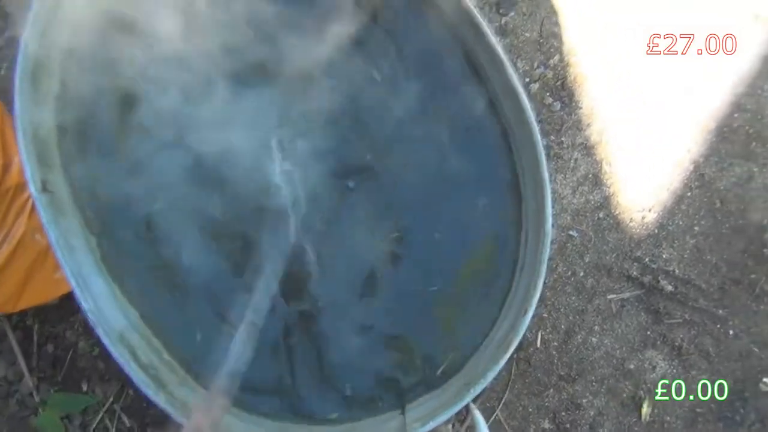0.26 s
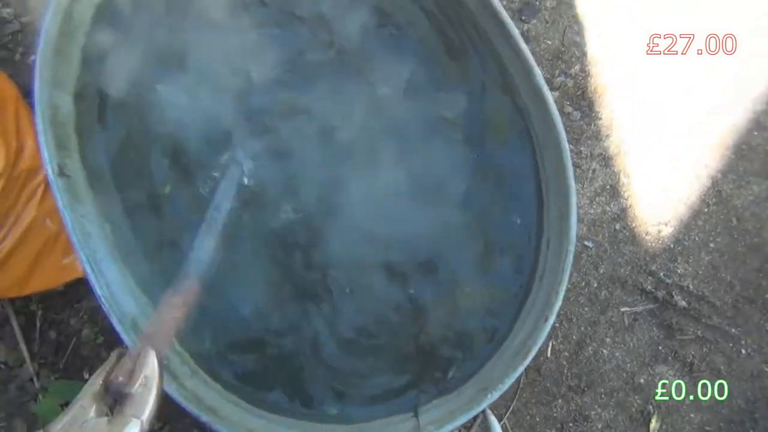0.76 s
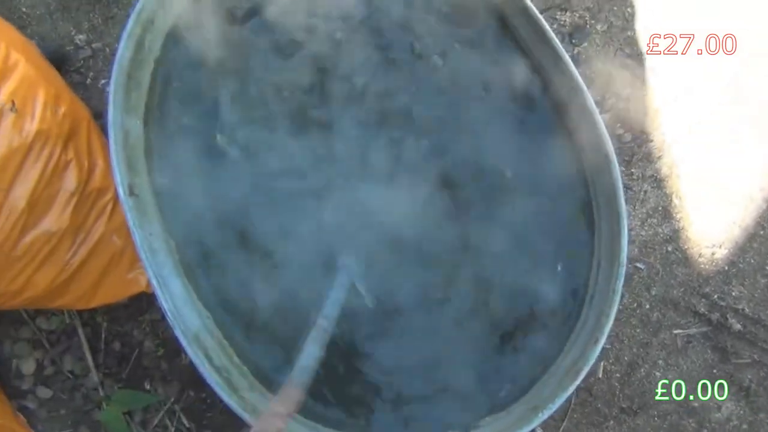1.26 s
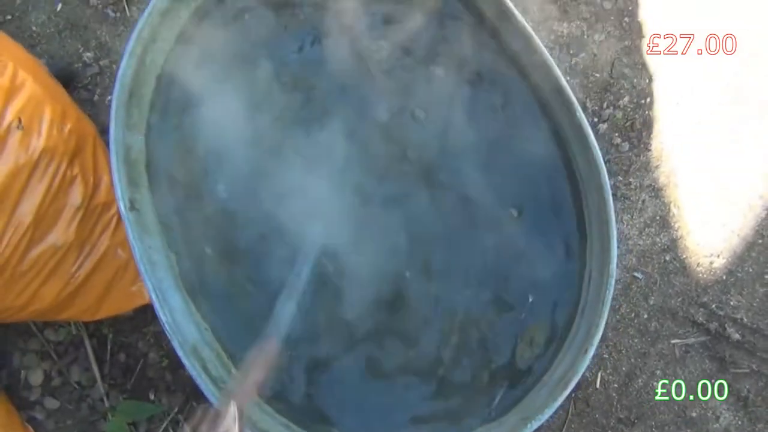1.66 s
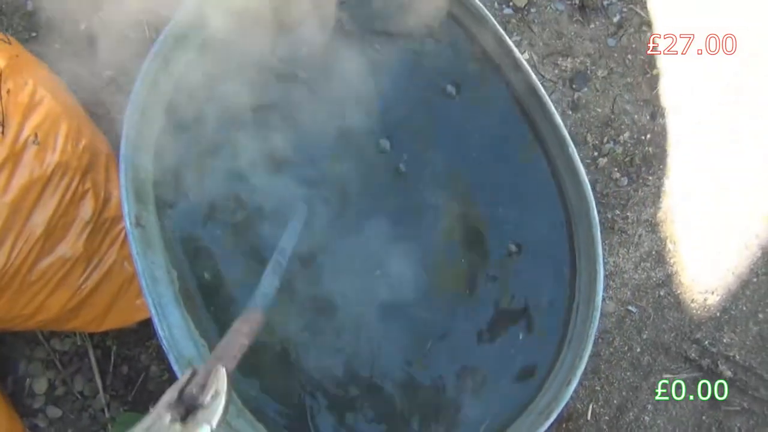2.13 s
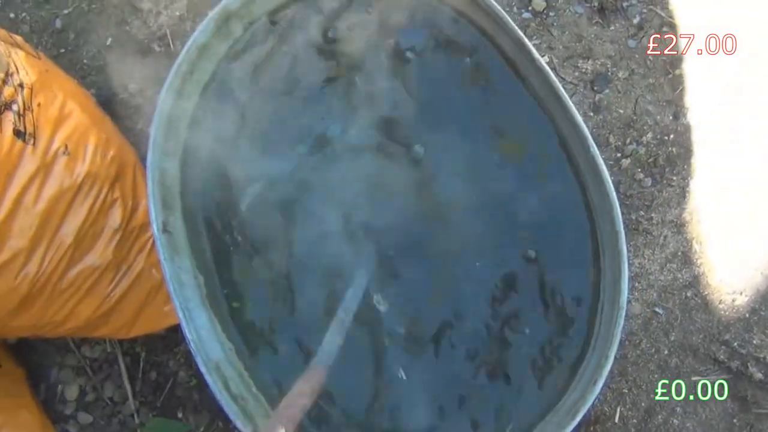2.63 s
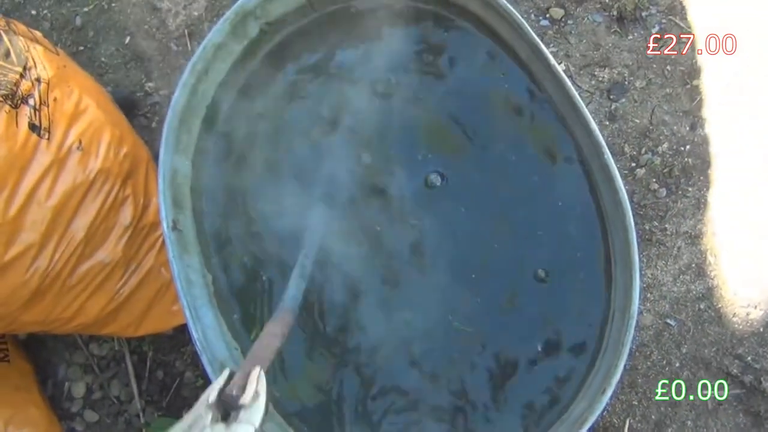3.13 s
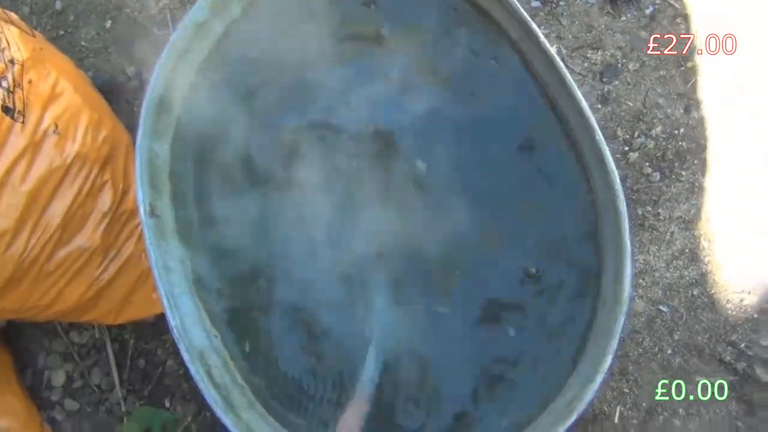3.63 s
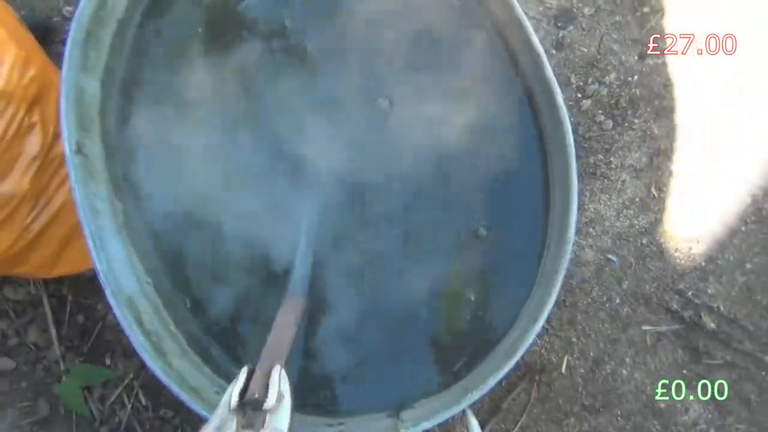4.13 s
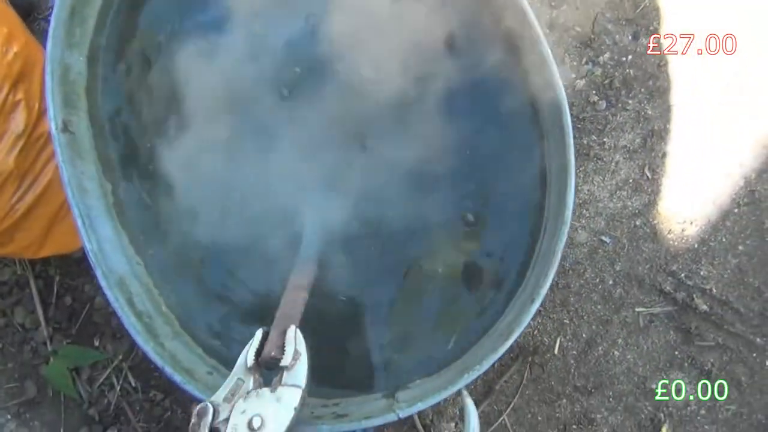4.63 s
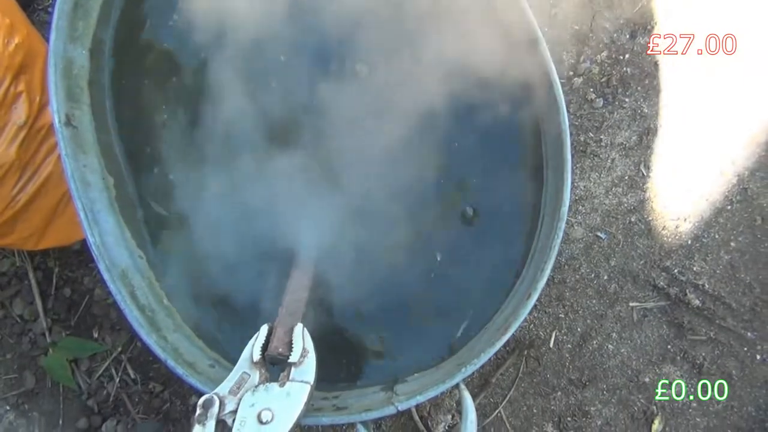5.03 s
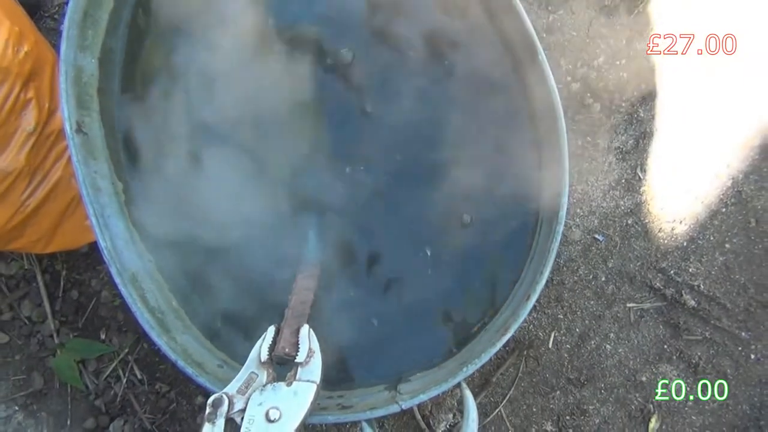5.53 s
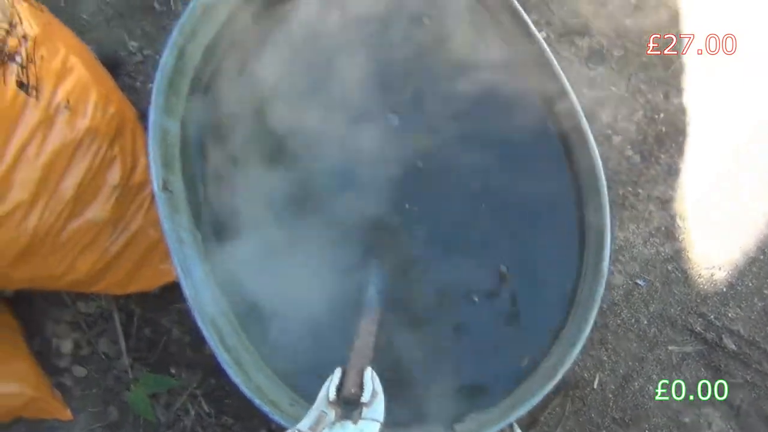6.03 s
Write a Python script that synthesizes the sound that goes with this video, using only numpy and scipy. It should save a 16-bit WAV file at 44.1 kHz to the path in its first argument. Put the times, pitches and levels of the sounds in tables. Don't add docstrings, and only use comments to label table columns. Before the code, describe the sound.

Sputtering steam hiss with choking gurgles, a sudden hard crack midway, violent rattling bursts against ringing metal, then softer sizzling over a faint distant drone.

```python
import sys
import numpy as np
from scipy import signal
from scipy.fft import rfft, irfft, next_fast_len
from scipy.io import wavfile
from scipy.ndimage import uniform_filter1d

SR = 44100
rng = np.random.default_rng(int(sys.argv[2]) if len(sys.argv) > 2 else 0)


def natural_amplitude(level_db):
    exponent = np.asarray(level_db, float) / 20
    return 10 ** exponent


def file_out(sig):
    cols = np.atleast_2d(sig).T
    lim = np.clip(cols, -1, 1)
    pcm = np.round(lim * 32767).astype(np.int16)
    wavfile.write(sys.argv[1], SR, pcm)


N = 277389
TIME = np.arange(N) / SR


def evened(x):
    return x / np.sqrt(np.mean(x ** 2) + 1e-20)


def read(points, hz):
    f, value = np.transpose(points)
    return np.interp(np.log(hz + 1), np.log(f + 1), value)


def coloured(x, spectrum):
    size = next_fast_len(N)
    gain = natural_amplitude(read(spectrum, np.fft.rfftfreq(size, 1 / SR)))
    return evened(irfft(rfft(x, size) * gain, size)[..., :N])


def resonate(x, hz, width_hz):
    turn = np.exp(2j * np.pi * np.cumsum(hz * np.ones(len(x))) / SR)
    r = np.exp(-np.pi * width_hz / SR)
    return 2 * (turn * signal.lfilter([1 - r], [1, -r], x / turn)).real


def ringing(x, hz, width_hz):
    r = np.exp(-np.pi * width_hz / SR)
    return 2 * signal.lfilter([1 - r], [1, -r * np.exp(2j * np.pi * hz / SR)], x).real


def restless(patchy_db, flicker_db, frames_long=8, bins_wide=8):
    frames = N // 128 + 5
    a, b, patches = rng.standard_normal((3, frames, 257))
    patches = uniform_filter1d(patches, frames_long, 0)
    patches = evened(uniform_filter1d(patches, bins_wide, 1))
    flicker = evened(uniform_filter1d(rng.standard_normal((frames, 1)), size=3, axis=0))
    z = (a + 1j * b) * natural_amplitude(patchy_db * patches + flicker_db * flicker)
    return evened(signal.istft(z.T, nperseg=512, noverlap=384)[1][:N])


def pops(per_s, spread_db):
    chance, size, sign = rng.random((3, N))
    height = natural_amplitude(spread_db * np.minimum(-np.log(size + 1e-9), 4))
    return evened((chance < per_s / SR) * height * np.sign(sign - 0.5))


def squeaks(per_s, lo_hz, hi_hz):
    out = np.zeros(N + SR)
    tries = 2500
    for when, keep, pitch, glide, length, size in rng.random((tries, 6)):
        if keep < per_s * N / SR / tries:
            t = np.arange(round((0.0078 + 0.0317 * length) * SR)) / SR
            hz = lo_hz * (hi_hz / lo_hz) ** pitch * (1 + 0.725 * (glide - 0.5) * t / t[-1])
            tone = np.sin(2 * np.pi * np.cumsum(hz) / SR) * np.hanning(len(t))
            out[int(when * N):][:len(t)] += natural_amplitude(-2.5 * np.log(size + 0.048)) * tone
    return evened(out[:N])


def dents(rows):
    coarse = TIME[::16]
    level_db = sum(db * np.exp(-((coarse - at) / half_s) ** 2) for at, half_s, db in rows)
    return np.interp(TIME, coarse, level_db)


# (frequency [Hz], density [dB])
YARD_SPECTRUM = [(15, -44), (30, -2.5), (58, 1), (97, -7.5), (182, -8.5), (257, -7), (422, -8.5),
                 (565, -6.5), (694, -13), (1500, -20), (1950, -10), (3300, -120)]
# (frequency [Hz], width [Hz], level [dB])
ENGINE_HUM = [(55.5, 8.2, -53), (134.2, 15, -53.5)]


def yard():
    air = rng.standard_normal(N)
    drone = sum(natural_amplitude(db) * evened(ringing(ringing(air, hz, width_hz), hz, width_hz))
                for hz, width_hz, db in ENGINE_HUM)
    return natural_amplitude(-40.5) * coloured(restless(1.7, 0.24, frames_long=35), YARD_SPECTRUM) + drone


# (frequency [Hz], density [dB])
JET_SPECTRUM = [(2940, -20), (5000, -20.5), (5290, -13.5), (6220, -13.5), (7600, -3.5), (10900, 3.5),
                (13400, -0.5), (15600, -7.5)]


def narrowed(x, peak_hz, share):
    hz, t, z = signal.stft(x, SR, nperseg=512)
    stretch = (np.interp(t, TIME, peak_hz) / np.median(peak_hz)) ** share
    shifted_hz = np.minimum(hz[:, None] / stretch, JET_SPECTRUM[-1][0])
    return evened(signal.istft(z * natural_amplitude(read(JET_SPECTRUM, shifted_hz)), SR, nperseg=512)[1][:N])


# (frequency [Hz], width [Hz], level [dB])
HIGH_MODES = [(1300, 78, 5.5), (1500, 53, 5.5), (1680, 75, 2), (1880, 120, -6), (2130, 42, 2),
              (2640, 32, 2), (3700, 250, -1)]


def wall(drive, modes=HIGH_MODES):
    return evened(sum(natural_amplitude(db) * evened(ringing(drive, hz, width_hz)) for hz, width_hz, db in modes))


# (frequency [Hz], density [dB])
SIZZLE_SPECTRUM = [(1060, -78), (1800, -22), (2050, -17.5), (2850, -4.5), (3120, -1), (4950, -2.5),
                   (7000, -1.5), (9100, -4), (15400, -120)]
# (frequency [Hz], density [dB])
GURGLE_SPECTRUM = [(150, -54), (250, -29), (278, -21.5), (547, -6), (976, -4.5), (1300, -3), (2600, -2),
                   (3380, -21), (5720, -120)]
# (time [s], vigour [dB], churn [dB])
BOIL_COURSE = [(0, -14.5, -6), (.11, -12, -7), (.5, -13, -9.5), (.83, -17.5, -7), (1.08, -16, -8),
               (1.25, -11.5, -15.5), (1.5, -17.5, -11), (1.72, -17.5, -13), (2.0, -18, -15),
               (3.1, -17, -18), (3.45, -15.5, -13), (3.6, -9, -19), (4.1, -13.5, -6), (4.7, -15, -1),
               (5.0, -18, -10.5), (5.35, -13.5, -12.5), (5.75, -22, -8.5), (6.03, -16, -14.5)]
# (tightest [s], depth [dB], closing [s], opening [s])
VENT_GULPS = [(.316, -4.5, .07, 0.13), (.576, -1, 0.088, 0.17), (.956, -3, 0.087, 0.065),
              (1.114, -8.5, 0.017, 0.12), (1.298, -12, 0.096, 0.029), (1.448, -4.5, 0.02, 0.032),
              (1.62, -7, 0.035, 0.11), (1.82, -11, 0.087, 0.048), (1.942, -14.5, 0.1, 0.047),
              (2.13, -6.5, 0.079, 0.096), (2.25, -15, 0.041, 0.03), (2.431, -12, 0.03, 0.049),
              (2.648, -13.5, 0.098, 0.012), (2.79, -8, 0.096, 0.029), (2.938, -15, 0.046, 0.044),
              (3.31, -12.5, 0.061, 0.089), (3.47, -16.5, 0.089, 0.044), (3.53, -21, 0.038, 0.028),
              (3.572, -1.5, 0.016, 0.052), (3.69, 3, 0.025, .01), (4.418, -5, 0.012, 0.091),
              (4.522, -8, 0.0099, 0.043), (4.724, -2, 0.028, 0.043), (5.246, -9.5, 0.16, 0.14),
              (5.588, -7, 0.25, 0.096), (5.915, -9, 0.13, 0.055), (5.96, -4, 0.033, 0.074),
              (6.15, -10, 0.13, 0.049), (6.245, -15, 0.084, 0.12)]
# (time [s], peak [Hz])
VENT_PEAK = [(0.0, 10740), (1.38, 11000), (1.49, 10200), (1.66, 11500), (1.84, 10200), (1.96, 11120),
             (2.28, 10300), (2.33, 11900), (2.38, 11000), (3.06, 11000), (3.13, 10200), (3.45, 11300),
             (3.5, 9200), (3.56, 11600), (3.61, 10400), (4.24, 11060), (6.24, 10300), (6.29, 10700)]
# (time [s], half length [s], level [dB])
WATER_CHOKES = [(0.153, 0.007, -4), (0.479, 0.017, -5), (0.868, 0.027, -4.5), (1.202, 0.018, 1.5),
                (1.495, 0.017, -6), (2.631, 0.017, -19), (3.375, 0.058, -6), (3.49, 0.022, -7),
                (2.235, 0.04, -7.5), (2.724, 0.039, 4), (4.25, 0.14, -6), (5.606, 0.039, 0.5),
                (5.923, 0.071, -5), (6.24, 0.095, -9), (3.57, 0.015, -24), (3.64, 0.058, 4.5),
                (3.723, .008, -4), (0.878, 0.064, 3), (3.97, 0.11, -1), (4.633, 0.025, -5.5)]
# (time [s], half length [s], level [dB])
DEEP_LULLS = [
    (.87, 0.067, -8),
    (1.19, 0.053, -8),
    (1.34, 0.032, -7),
    (1.52, 0.052, -8),
    (1.62, .05, -0.5),
    (1.25, 0.015, 1),
    (1.9, 0.33, -1.5),
    (5.5, 0.32, -4),
]


def steam():
    gulp_bend = 0.61
    squeeze = 0.0028
    s, vigour_db, churn_db = np.transpose(BOIL_COURSE)
    vigour_db, churn_db = np.interp(TIME, s, vigour_db), np.interp(TIME, s, churn_db)
    gulp_db = sum(db * np.interp(TIME, [at - closing_s, at, at + opening_s], [0, 1, 0]) ** gulp_bend
                  for at, db, closing_s, opening_s in VENT_GULPS)
    choke_db = dents(WATER_CHOKES)

    flow = restless(1.9, 0.6, bins_wide=12) + 0.5 * pops(3000, 2.8)
    peak_hz = np.interp(TIME, *np.transpose(VENT_PEAK)) * 2 ** (-squeeze * gulp_db)
    jet = narrowed(flow, peak_hz, share=0.77)

    fizz = restless(2.43, 0.71, frames_long=5) + 0.48 * pops(900, 3.0)
    sizzle = coloured(fizz + 0.1 * squeaks(300, 2200, 6000), SIZZLE_SPECTRUM)
    sizzle = evened(sizzle + 0.12 * wall(sizzle))

    bubbling = restless(2.66, 0.64, frames_long=10, bins_wide=5) + 0.26 * pops(200, 3.4)
    gurgle = coloured(bubbling + 0.07 * squeaks(110, 502.7, 2583), GURGLE_SPECTRUM)
    deep = signal.sosfiltfilt(signal.butter(3, 1500, fs=SR, output="sos"), gurgle)
    gurgle = gurgle + (natural_amplitude(dents(DEEP_LULLS)) - 1) * deep

    mix = natural_amplitude(2.0 + gulp_db) * jet
    mix = mix + natural_amplitude(-4 + 0.23 * churn_db + 0.56 * gulp_db + 0.5 * choke_db) * sizzle
    mix = mix + natural_amplitude(-1.85 + churn_db + 0.21 * gulp_db + choke_db) * gurgle
    return natural_amplitude(vigour_db) * mix


# (start [s], length [s], middle [Hz], glide [octaves], level [dB])
GLIDING_POCKETS = [(0.036, 0.032, 2440, -0.69, -20), (0.07, 0.047, 2170, 0.05, -23),
                   (.114, 0.011, 2600, 0.58, -12.5), (0.164, .012, 3800, -.7, -22),
                   (0.187, .01, 1770, -0.11, -20), (0.369, .014, 2320, -1.4, -24),
                   (.271, 0.016, 2830, 0.39, -18), (0.324, 0.046, 2850, 0.54, -26),
                   (0.36, 0.054, 1730, -0.61, -23.5), (0.468, 0.021, 812, 0.32, -29),
                   (0.472, 0.007, 3370, -0.053, -17), (0.486, 0.055, 2530, -0.86, -23),
                   (.505, .02, 3430, -0.055, -21), (0.65, 0.02, 2750, -0.85, -22),
                   (0.718, 0.011, 2700, 1, -24), (0.729, 0.016, 3200, .8, -23),
                   (0.72, 0.015, 1280, 0.27, -28), (0.827, 0.04, 3960, -1, -26.5),
                   (1.015, 0.016, 787, 0.97, -26.5), (1.14, 0.022, 2910, -.6, -28),
                   (1.158, 0.0346, 1340, -0.99, -35), (1.186, 0.048, 717, -1.25, -30),
                   (1.224, 0.049, 560, 0.78, -33.5), (0.517, 0.034, 1550, -0.96, -29),
                   (.56, 0.052, 1100, .15, -34), (1.296, .0096, 2010, 0.74, -28),
                   (1.36, 0.018, 2680, -0.79, -25), (1.374, 0.023, 662, -0.59, -27),
                   (2.047, .013, 2100, 0.33, -38), (3.548, 0.012, 450, 0.36, -22),
                   (4.846, 0.12, 489, -1.05, -29)]
# (start [s], length [s], lowest [Hz], level [dB])
DIPPING_POCKETS = [
    (0.179, .093, 1295, -23.5),
    (0.532, 0.111, 1050, -31.5),
]
# (start [s], length [s], frequency [Hz], level [dB])
STEADY_POCKETS = [(0.042, 0.087, 2960, -26), (0.07, 0.033, 4970, -21), (0.254, 0.14, 610, -33.5),
                  (0.35, 0.071, 4630, -22), (.417, 0.026, 2200, -25), (0.586, 0.071, 1680, -30),
                  (1.195, 0.034, 1890, -27.5), (1.683, 0.012, 800, -34), (2.366, 0.015, 950, -29.5),
                  (3.513, 0.025, 3950, -18), (4.09, .02, 3700, -25), (4.36, .06, 2650, -28),
                  (4.579, .04, 2090, -30), (4.75, 0.046, 1232, -16), (4.677, 0.077, 1533, -18.5),
                  (3.518, 0.033, 345, -25), (3.521, 0.038, 1560, -15), (3.586, 0.014, 1980, -13),
                  (3.594, 0.013, 3730, -10.5), (3.7, .013, 3200, -16), (4.519, 0.033, 1450, -34),
                  (4.524, 0.055, 2200, -23), (4.531, 0.075, 650, -23), (4.697, 0.068, 1800, -20),
                  (4.702, 0.022, 530, -23), (4.755, 0.082, 705, -18), (4.68, .1, 2300, -25),
                  (4.103, .05, 2200, -26), (4.3, .03, 1500, -22), (4.53, 0.047, 1500, -23),
                  (3.739, .035, 1690, -21), (0.071, .04, 2200, -28)]


def pockets():
    dip_octaves = 0.55
    out = np.zeros(N)
    breath, shake = rng.standard_normal((2, N))
    shake = evened(uniform_filter1d(shake, 150))
    flutter = np.clip(evened(uniform_filter1d(breath[::-1], size=180)), -2, 1.5)
    rows = [(s, length_s, hz, glide, 0, db) for s, length_s, hz, glide, db in GLIDING_POCKETS]
    rows += [(s, length_s, hz, 0, dip_octaves, db) for s, length_s, hz, db in DIPPING_POCKETS]
    rows += [(s, length_s, hz, 0, 0, db) for s, length_s, hz, db in STEADY_POCKETS]
    for s, length_s, mid_hz, glide, dip, db in rows:
        span = slice(round(s * SR), round((s + length_s) * SR))
        u = np.linspace(-1, 1, span.stop - span.start)
        hz = mid_hz * 2 ** (glide * u / 2 + dip * u ** 2)
        width_hz = 20 + 0.2 * mid_hz
        air = resonate(resonate(breath[span], hz, width_hz), hz, width_hz)
        shaky_hz = hz + 0.05 * (hz - 300) * shake[span]
        whistle = np.sin(2 * np.pi * np.cumsum(shaky_hz) / SR)
        tone = evened(evened(air) + (0.2 + (900 / mid_hz) ** 2) * whistle)
        flutter_db = min((mid_hz / 600) ** 2, 4.5, length_s / 0.008) * flutter[span]
        out[span] += natural_amplitude(db + flutter_db) * tone * signal.windows.tukey(len(u), 0.35)
    return out


# (time [s], peak [dB])
COLLAPSES = [(.037, -14), (.056, -9), (.163, -11), (.37, -14), (.4918, -11), (2.655, -22), (3.5105, -11),
             (3.592, -6), (4.297, -6), (4.361, -12), (4.677, -9), (6.042, -15), (3.529, 0), (3.5355, -6),
             (3.5545, -12), (3.6, -9), (3.614, -16), (3.724, -14), (3.811, -13), (3.821, -1), (4.109, -9),
             (4.123, -5), (4.305, -11), (4.423, -11), (4.463, -13), (4.482, -10), (4.518, -14), (4.537, -5),
             (4.55, -6), (4.564, -6), (4.7115, -11), (4.7235, -9), (4.7365, -10), (4.749, -3), (4.759, -10),
             (4.7775, -10), (4.8055, -15), (4.8155, -18)]


def ticks():
    snap_hz, decay_s = 2200, 0.00021
    t = np.arange(-100, 101) / SR
    train = np.zeros(N)
    s, db = np.transpose(COLLAPSES)
    train[np.round(s * SR).astype(int)] = -natural_amplitude(db)
    return np.convolve(train, np.cos(2 * np.pi * snap_hz * t) * np.exp(-abs(t) / decay_s), "same")


# (start [s], level [dB], relative boom [dB], relative crackle [dB], length [s])
SHOWERS = [(3.035, -29.5, 3.5, -0.5, 0.056), (3.513, -2, -26, -12.5, 0.023), (3.533, -7.5, 1, -23, 0.017),
           (3.592, -20, -10, 2.5, 0.012), (3.613, -33, -20, 0, 0.0063), (3.703, -21.5, -20, 4.5, .01),
           (3.723, -5, -9, -14, 0.022), (3.748, -21.5, 3.5, -8, 0.026), (3.803, -20, -19, 3, 0.058),
           (3.919, -28, 5.5, 3.5, 0.039), (4.093, -7.5, -21, -7, 0.036), (4.11, -25, -1, -1, 0.07),
           (4.298, -5.5, -6, -10.5, 0.0096), (4.359, -16.5, -26, -3, 0.045), (4.41, -9, 1.5, -5.5, 0.015),
           (4.433, -10, -3, -8, 0.018), (4.461, -10.5, 3, -19, 0.011), (4.48, -17, 5, -18, 0.034),
           (4.517, -5.5, -22, -14, 0.048), (4.56, -10.5, -0.5, -21, 0.051), (4.677, -3.5, -14, -15, 0.035),
           (4.712, -8.5, 4.5, -9, 0.012), (4.746, -2.5, -11, -9.5, 0.015), (4.794, -18.5, 6, -12, 0.043),
           (4.876, -10, -4.5, -30, 0.035), (4.942, -30.5, 6.5, -7, 0.048), (5.01, -15, -34, -15, 0.062),
           (5.1, -21, -33, -6, 0.064)]
# (frequency [Hz], width [Hz], level [dB])
LOW_MODES = [(244, 20, -13.5), (345, 12, -9.5), (430, 26, -7), (560, 130, 2), (650, 55, -28), (700, 37, -9),
             (990, 400, -1.5)]
# (frequency [Hz], density [dB])
CRACKLE_SPECTRUM = [(150, -27), (500, 2.5), (1500, 2.5), (4000, 3.5), (7000, -0.5), (11000, -15),
                    (16000, -41)]


def bursts():
    cloud_hz, cloud_octaves_per_db = 1150, 0.55
    shower = evened(0.6 * pops(1500, 2.8) + rng.standard_normal(N))
    ring, boom, crack, cloud = np.zeros((4, N))
    t = TIME[:SR // 4]
    snap = 1 + 1.5 * np.exp(-t / 0.003)
    for s, db, boom_db, crack_db, length_s in SHOWERS:
        hz = cloud_hz * 2 ** (-cloud_octaves_per_db * db)
        span = slice(round(s * SR), round(s * SR) + len(t))
        force = np.minimum(t / 0.00057, 1) * natural_amplitude(db - 60 * np.maximum(t - length_s, 0) / 0.28)
        ring[span] = np.hypot(ring[span], force * snap)
        boom[span] = np.hypot(boom[span], force * natural_amplitude(boom_db))
        crack[span] = np.hypot(crack[span], force * snap * natural_amplitude(crack_db - 60 * t / 1.3))
        cloud[span] += force * evened(ringing(ringing(shower[span], hz, 620), hz, 620))
    ring_rms, boom_rms, crack_rms = [np.sqrt(np.mean(v ** 2)) for v in (ring, boom, crack)]
    metal = natural_amplitude(-16.0) * ring_rms * wall(ring * shower)
    metal = metal + natural_amplitude(-8.0) * boom_rms * wall(boom * shower, LOW_MODES)
    crackle = natural_amplitude(-0.5) * crack_rms * coloured(crack * shower, CRACKLE_SPECTRUM)
    return metal + natural_amplitude(-23) * cloud + crackle


# (start [s], frequency [Hz], level [dB], t60 [s])
WALL_TONES = [(3.54, 348, -17.5, 0.73), (3.545, 150, -28, .15), (4.415, 150, -29, .2), (4.46, 147, -28, .2),
              (4.50, 156, -29, .2), (4.595, 155, -27, .2), (3.545, 520, -25, .9), (3.535, 570, -15, .25),
              (3.725, 439, -25, .8), (3.75, 560, -27, .5), (4.30, 480, -24, .3), (4.412, 660, -24, .3),
              (4.48, 538, -23, .7), (4.53, 720, -23, 0.63), (4.715, 690, -17, .6),
              (4.775, 235, -27.5, 0.67), (4.88, 400, -28, 0.69), (4.875, 220, -27, .2),
              (3.52, 1900, -14, 0.3), (3.515, 1310, -17, .3), (4.68, 1700, -19, .4), (4.70, 1700, -22, .4),
              (4.53, 2000, -24, .4), (3.745, 1500, -26, 0.37)]
# (frequency [Hz], width [Hz], level [dB])
SONG_MODES = [(1405, 20, 1), (2226, 18, 1), (2615, 16, 5.5), (3700, 40, -2), (4060, 25, 1)]


def gongs():
    rise_s, song_s, song_db, fade_db_per_s = 0.008, 4.95, -34.5, 8
    out, t = np.zeros(N), TIME[:SR // 2]
    fade = signal.windows.tukey(2 * len(t), 0.5)[len(t):]
    for s, hz, db, t60_s in WALL_TONES:
        level = np.minimum(t / rise_s, 1) * natural_amplitude(db - 60 * t / t60_s)
        out[round(s * SR):][:len(t)] += level * np.sin(2 * np.pi * hz * t) * fade
    after = TIME[TIME > song_s] - song_s
    song = wall(rng.standard_normal(len(after)), SONG_MODES)
    out[-len(after):] += np.minimum(after / 0.061, 1) * natural_amplitude(song_db - fade_db_per_s * after) * song
    return out


# (time [s], half length [s], centre [Hz], level [dB])
BOIL_SHADES = [(3.38, 0.085, 1950, -10), (2.8, 0.1, 5100, -3), (0.486, 0.016, 1400, -13),
               (1.54, .04, 1100, -2), (1.83, .07, 1200, -1), (1.89, .04, 1750, 6), (1.71, .05, 2300, -2),
               (5.33, .08, 3500, -3), (4.9, .04, 4500, -4), (.95, .1, 1100, -4), (.85, .1, 1600, 3),
               (1.26, 0.054, 1800, 3), (1.585, 0.053, 2000, 9), (6.22, .07, 3000, -6),
               (0.36, .04, 2800, 0), (0.5, .03, 2000, 4), (.48, .012, 2200, -8), (1.42, 0.061, 2600, -3),
               (2.0, 0.033, 3000, 2), (1.8, .015, 5000, -4), (2.52, 0.057, 1500, -4),
               (2.64, 0.025, 1600, -4), (5.6, 0.43, 2000, -1.5), (3.65, .04, 3500, 5),
               (4.26, .03, 1600, -2), (5.4, .02, 1200, 4), (5.3, 0.034, 4900, 3), (4.5, .025, 1500, -2),
               (1.5, .04, 9600, 2), (2.35, 0.027, 12500, 0.5), (2.5, .04, 14600, 4),
               (5.7, 0.067, 2800, -7), (3.4, 0.093, 5400, -2.5), (2.25, .03, 6200, 1),
               (5.0, 0.092, 4500, 3), (1.8, .015, 4800, -5), (4.6, 0.061, 3000, -2.5),
               (2.0, 0.28, 16000, 3), (6.04, .05, 5300, 2), (4.8, 0.054, 1000, -7), (.6, .05, 1400, 5)]
# (frequency [Hz], side minus mid [dB])
SIDE_LEVEL = [(30, -51), (120, -45), (240, -29.5), (480, -25.5), (950, -22.5), (1890, -25), (3770, -19),
              (7520, -25), (15000, -17.5)]
# (frequency [Hz], left minus right [dB])
LEFT_LEAN = [(60, 0.1), (240, -0.5), (950, -0.073), (3770, 0.61), (15000, -0.56)]
# (frequency [Hz], level [dB])
TUB_WIDTH = [(100, 25), (400, 7.5), (1000, -6), (3000, 2), (8000, -3)]


def stereo(boil, tub):
    shade_octaves = 0.31
    hz, t, (near, broad) = signal.stft(np.array([boil, tub]), SR, nperseg=1024)
    shade_db = 0
    for at, half_s, centre_hz, db in BOIL_SHADES:
        band = np.exp(-(np.log2((hz + 1) / centre_hz) / shade_octaves) ** 2)
        shade_db = shade_db + db * np.outer(band, np.exp(-((t - at) / half_s) ** 2))
    near = near * natural_amplitude(shade_db)
    gusts = uniform_filter1d(rng.standard_normal(near.shape), 12, 0)
    gusts = evened(uniform_filter1d(gusts, 4, 1))
    sweep = evened(uniform_filter1d(rng.standard_normal(len(t)), size=3))
    depth_db = read([(300, 9), (1500, 4.8)], hz)[:, None]
    side_db = read(SIDE_LEVEL, hz)[:, None] + np.minimum(depth_db * gusts + 3 * sweep, 9) + 5.5
    scattered = near + broad * natural_amplitude(read(TUB_WIDTH, hz))[:, None]
    scattered = scattered * np.exp(2j * np.pi * rng.random(near.shape)) * natural_amplitude(side_db)
    z, lean = near + broad, natural_amplitude(read(LEFT_LEAN, hz) / 2)[:, None]
    pair = np.array([(z + scattered) * lean, (z - scattered) / lean])
    return signal.istft(pair, SR, nperseg=1024)[1][:, :N]


# (time [s], half length [s], level [dB])
BRIEF_HUSHES = [
    (3.57, .004, -5),
    (3.69, 0.0049, -2),
    (3.716, 0.0036, -5),
    (4.41, 0.0035, -4),
    (4.52, 0.0035, -2),
    (4.66, .01, -2),
    (4.714, .003, -2),
    (4.749, 0.003, -9),
]


def scene():
    hush = natural_amplitude(dents(BRIEF_HUSHES))
    boil = hush * steam() + yard()
    tub = hush * (pockets() + bursts() + gongs()) + ticks()
    return stereo(boil, tub)


def top_cut(x):
    return signal.sosfilt(signal.butter(12, 16700, fs=SR, output="sos"), x)


def record(dry):
    power_db = 10 * np.log10(signal.lfilter([0.006], [1, -0.994], (dry ** 2).mean(0)) + 1e-12)
    fall_db = TIME * 73.0
    over_db = np.maximum(np.maximum.accumulate(power_db + fall_db) - fall_db + 15.5, 0)
    held = dry / natural_amplitude(0.73 * uniform_filter1d(over_db, 60))
    held = 0.8 * np.tanh(held / 0.83)
    low_pass = signal.firwin(801, 15870, window=("kaiser", 9), fs=SR)
    return top_cut(signal.oaconvolve(held, low_pass[None], "same"))


dry = scene()
out = record(dry)
file_out(out)
```